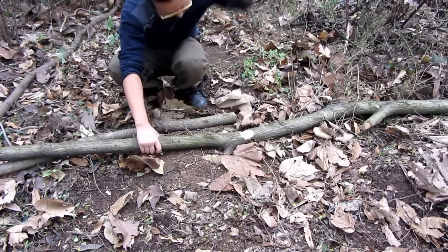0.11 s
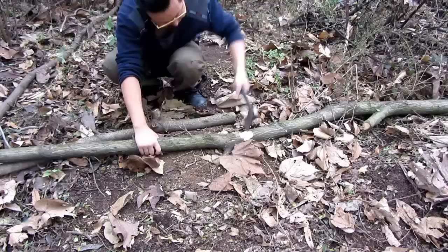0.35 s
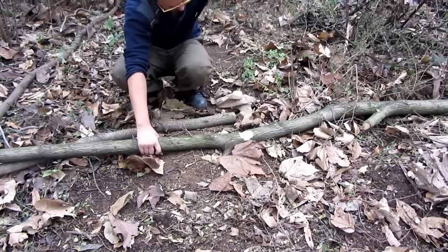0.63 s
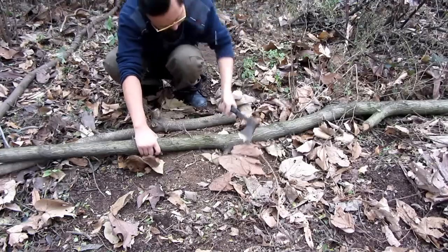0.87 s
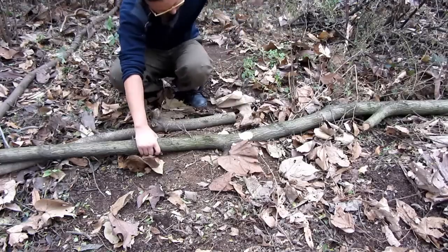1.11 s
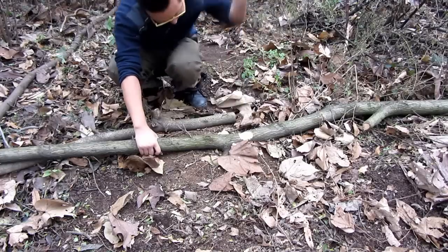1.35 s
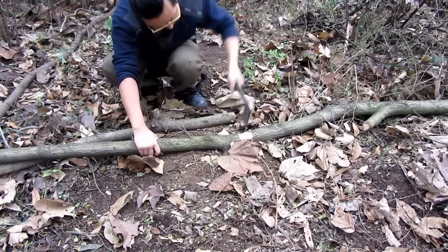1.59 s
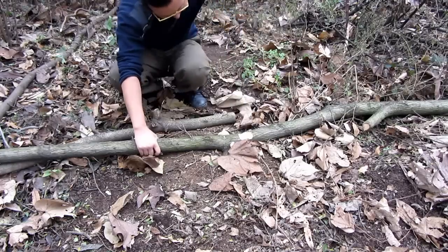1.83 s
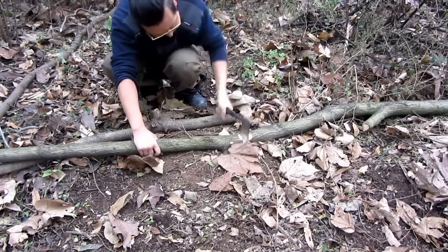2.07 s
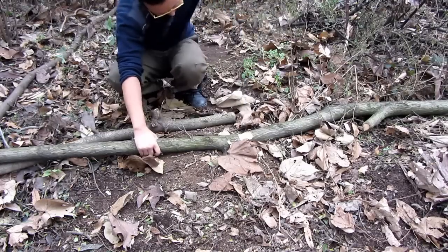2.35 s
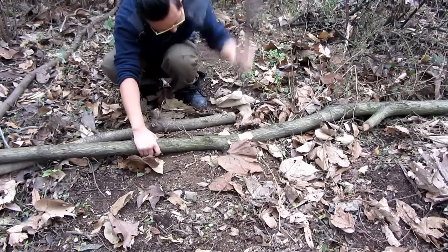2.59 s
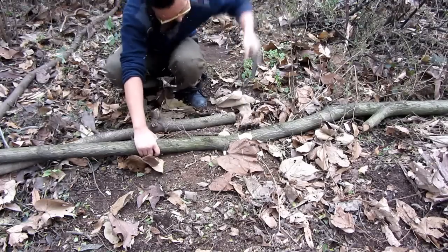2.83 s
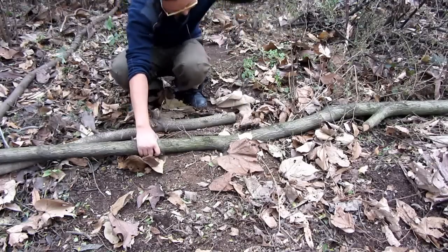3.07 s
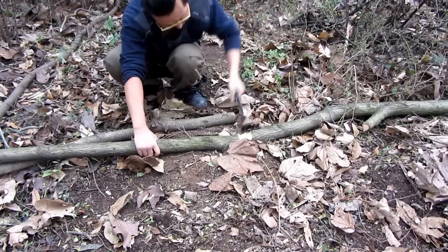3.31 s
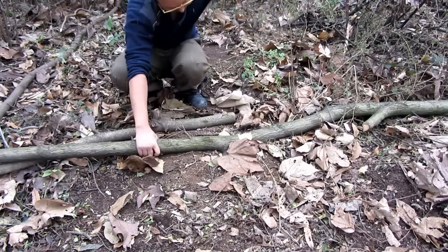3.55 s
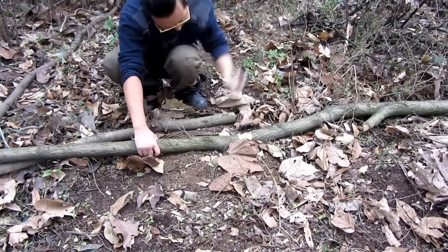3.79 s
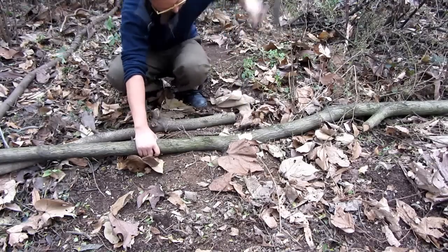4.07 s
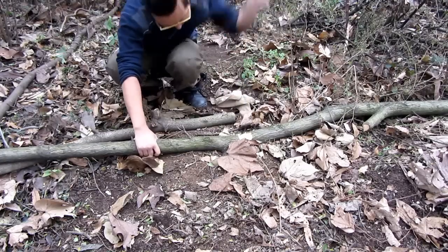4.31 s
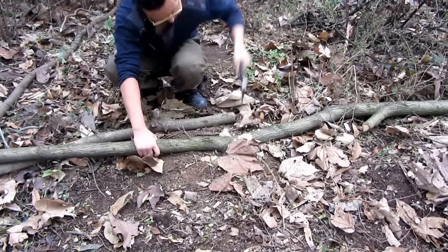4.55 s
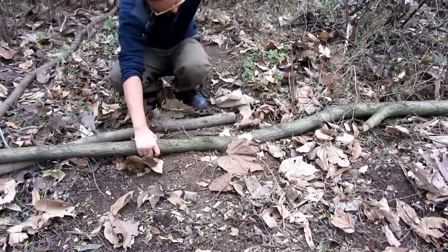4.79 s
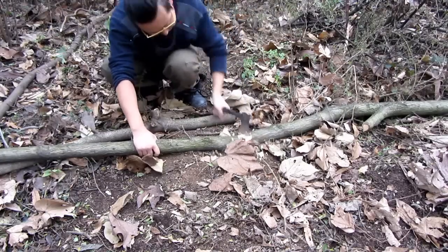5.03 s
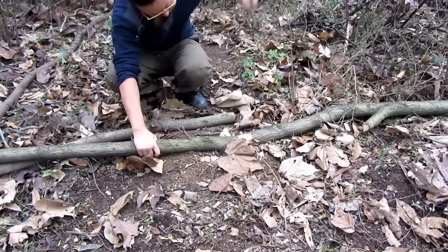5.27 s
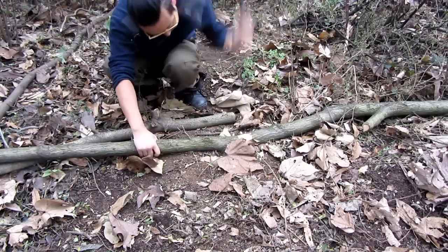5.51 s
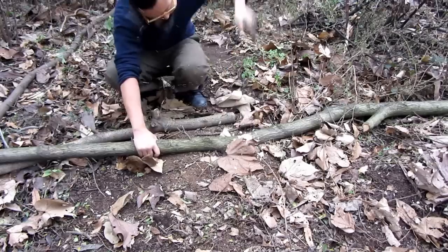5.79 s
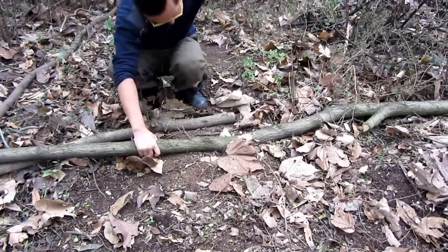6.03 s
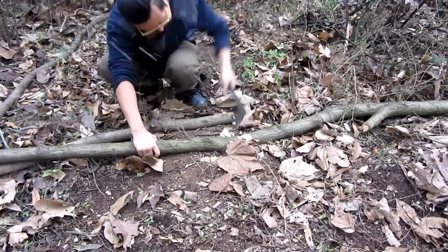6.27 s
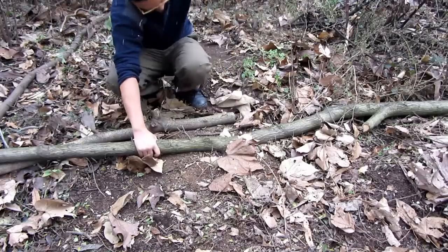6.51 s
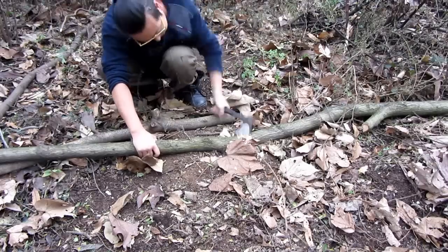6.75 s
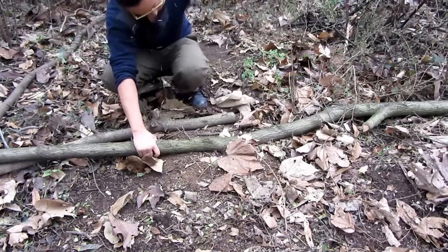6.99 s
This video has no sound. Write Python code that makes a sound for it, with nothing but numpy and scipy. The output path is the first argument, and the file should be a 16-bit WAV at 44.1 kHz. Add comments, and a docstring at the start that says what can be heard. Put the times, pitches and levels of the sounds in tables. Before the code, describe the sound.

Regular dry hacking of a hand blade on a thin branch outdoors, each crisp knock short and bright, with faint leaf ticks between.

```python
"""On a woodland floor, a short blade chops a thin green log, a few steps away.
Each blow is a spiky noise of tearing fibres, a short ping of steel and the fading tones of the log.
Chips tick down in the litter as short clicks; sound processing smears a soft noise around each blow.
Grainy noise makes the rustling leaves; steady noise makes the still air and the hum of far traffic."""
import sys
import numpy as np
from scipy import signal
from scipy.fft import rfft, irfft, next_fast_len
from scipy.io import wavfile
from scipy.ndimage import uniform_filter1d, map_coordinates

SR = 44100
rng = np.random.default_rng(int(sys.argv[2]) if len(sys.argv) > 2 else 0)


def generate_wav(sig):
    """Save sig (samples, or channels by samples) to the path in sys.argv[1] as 16-bit PCM at SR."""
    pcm = np.round(np.clip(np.atleast_2d(sig).T, -1, 1) * 32767).astype(np.int16)
    wavfile.write(sys.argv[1], SR, pcm)


def attenuation_scalar(level_db):
    """Turn a level in dB into a linear amplitude multiplier (20 dB per decade)."""
    decades = np.asarray(level_db, float) / 20
    return 10 ** decades


N = 314433  # length in samples

# blows of the blade: start_s, ring_db, ring_hz (centre of the ring), knock_db, thud_db, edge_db
BLOWS = [(0.32, -15, 1460, -30.5, -22.5, -14), (.921, -15.5, 2000, -25.5, -27, -20.5),
         (1.529, -17, 1300, -22.5, -23, -20), (2.124, -15.5, 1514, -21.5, -27.5, -23),
         (2.7104, -11.5, 977, -23, -30.5, -20.5), (3.3044, -12, 1278, -18.5, -26, -18.5),
         (3.894, -19, 2350, -30, -24, -18), (4.482, -12.5, 1450, -17, -20.5, -16),
         (5.0746, -12, 1429, -23, -22.5, -23), (5.659, -15.5, 1060, -22.5, -22.5, -14),
         (6.2413, -13, 1026, -25, -27, -16), (6.8218, -12, 2700, -22, -20.5, -19.5)]
LIGHT_KNOCK_HZ = 960  # centre of the ring when the log knocks lightly


def unit(x):
    """Scales a sound to an average strength (rms) of 1."""
    return x / np.sqrt(np.mean(x ** 2) + 1e-20)


def along(points, hz):
    """Reads a curve of (pitch_hz, value) points on a logarithmic pitch axis."""
    point_hz, value = np.transpose(points)
    return np.interp(np.log(hz + 1), np.log(point_hz + 1), value)


def curve(rows):
    """Joins (start_s, value) rows into one value per sample."""
    return np.interp(np.arange(N) / SR, *np.transpose(rows))


def filtered(x, response):
    """Shapes a sound by a complex response that depends on frequency."""
    n = x.shape[-1]
    padded = next_fast_len(n + 8192)
    spectrum = rfft(x, padded) * response(np.fft.rfftfreq(padded, 1 / SR))
    return irfft(spectrum, padded)[..., :n]


def add(track, start_s, sound):
    """Mixes a sound into a track, cutting off what runs past the end."""
    part = track[..., round(start_s * SR):][..., :sound.shape[-1]]
    part += sound[..., :part.shape[-1]]


def chops():
    """The edge tears fibres and sets log and blade ringing; the log also knocks lightly."""
    # light knocks of the log, mostly just after a blow: start_s, knock_db, ring_db
    light_knocks = [(0.341, -37.5, -46), (0.373, -44.5, -49), (0.954, -36, -34), (1.558, -34, -31.5),
                    (2.157, -38, -32), (2.193, -54.5, -40.5), (3.393, -52.5, -35.5), (3.907, -36, -26.5),
                    (4.507, -39, -33), (4.562, -51.5, -42.5), (5.066, -41.5, -32.5), (5.116, -44, -57),
                    (5.688, -35.5, -27.5), (5.743, -60, -41), (6.266, -38, -31.5)]
    out = np.zeros((2, N))
    for start_s, ring_db, ring_hz, knock_db, thud_db, edge_db in BLOWS:
        # a brighter edge than usual (-19.5 dB) bites for less time
        bite_ms = 4.17 - 0.19 * (edge_db + 19.5)
        low_crunch = tear((ring_db + edge_db) / 2 + 2, bite_ms, 0, 4425)
        high_crunch = tear(edge_db, 1.13 * bite_ms, 4130, 20000)
        blow = low_crunch + high_crunch + blade(edge_db)
        # the blade sinks in before the log takes the blow; sharper blows sink for less time
        sink_s = 0.002485 * (LIGHT_KNOCK_HZ / ring_hz) ** 2
        add(blow, sink_s, log(thud_db, knock_db, ring_db, ring_hz))
        add(out, start_s, ports(blow))
        add(out, start_s, attenuation_scalar(-19) * echo(blow))
    for start_s, knock_db, ring_db in light_knocks:
        add(out, start_s, ports(log(knock_db, knock_db, ring_db, LIGHT_KNOCK_HZ)))
    return out


def tear(db, bite_ms, lo_hz, hi_hz):
    """Fibres snap in a spiky burst for as long as the edge bites, then splinters settle."""
    # colour of torn wood: pitch_hz, relative level_db (per Hz)
    fibre_colour = [(880, -0.5), (1500, 5), (3690, -2.5), (4730, -12.5), (6240, -4.5), (6760, -11.5),
                    (7840, -8), (9010, -13), (14500, -29), (16000, -77.5)]
    t = np.arange(SR // 4) / SR
    bite = (1 - np.exp(-t / 0.0011)) * np.exp(-(t * 1000 / max(bite_ms, .5)) ** 3)
    settling = (1 - np.exp(-t / 0.0041)) * attenuation_scalar(-13.0 - 60 * t / 0.026)
    # random gains on the noise make it spiky
    spikes = rng.standard_normal(len(t)) * attenuation_scalar(3.2 * rng.standard_normal(len(t)))
    snaps = filtered(spikes, lambda f: attenuation_scalar(along(fibre_colour, f)) * (f >= lo_hz) * (f < hi_hz))
    snaps *= np.linalg.norm(bite) / np.linalg.norm(bite * snaps)  # same strength for every bite
    return attenuation_scalar(db) * snaps * (bite + settling)


def blade(db):
    """The steel gives a brief damped ping: a few tones that die within milliseconds."""
    # tones of the gripped blade: pitch_hz, level_db (relative to the edge), t60_s (time to fall 60 dB)
    blade_modes = [(5500, -3, 0.0086), (5886, -4, 0.016), (7980, -17.5, 0.013)]
    t = np.arange(SR // 4) / SR
    rise = 1 - np.exp(-t / 0.00026)
    ping = np.zeros(len(t))
    for hz, level_db, t60_s in blade_modes:
        fade = attenuation_scalar(db + level_db + rng.normal(0, 3.0) - 60 * t / t60_s)
        ping += fade * rise * np.sin(2 * np.pi * hz * t)
    return ping


def log(thud_db, knock_db, ring_db, ring_hz):
    """The log rings in bending modes; its slow low bending waves arrive last."""
    # bending modes: pitch_hz, level_db (relative to the drive), t60_s (time to fall 60 dB)
    log_modes = [(71.7, 7, 0.087), (134.2, 14, 0.06), (221.7, 3.5, 0.1), (346.8, 7.5, 0.079),
                 (482.6, 6, 0.067), (605.6, 4.5, 0.062), (736, -3.5, 0.086), (818, -1, 0.084),
                 (977, 3, 0.052), (1064.5, -4, 0.047), (1225, 2.5, 0.023), (1450, 3, 0.026),
                 (1669, -2, 0.033), (1881, -4, 0.042), (2180, 6.5, 0.025), (2226, -8.5, 0.024),
                 (2584, -1, 0.038), (2991, 3, 0.018), (3324, 2.5, 0.017)]
    t = np.arange(SR // 4) / SR
    hz, mode_db, t60_s = np.array(log_modes).T[:, :, None]
    # the contact favours modes near its own pitch
    upper_db = ring_db - 9 * np.minimum(np.abs(np.log2(hz / ring_hz)), 1.3)
    # thud drives the lowest modes, knock the middle ones, ring the rest
    drive_db = np.where(hz < 280, thud_db, np.where(hz < 900, knock_db, upper_db))
    rise = 1 - np.exp(-t * hz / 2.02)
    # the held log never rings purely, so each phase wanders
    wander = np.cumsum(rng.standard_normal((len(hz), len(t))), axis=1)
    drift = wander * 0.055 * (hz / 1000) ** 0.27
    phase = 2 * np.pi * (hz * t + rng.random(hz.shape)) + drift
    fade = attenuation_scalar(drive_db + mode_db + rng.normal(0, 0.34, hz.shape) - 60 * t / t60_s)
    return np.sum(fade * rise * np.sin(phase), axis=0)


def ports(x):
    """The log as the two microphone ports hear it; the deep bass falls away."""
    # left over right: pitch_hz, level_db
    lean = [(60, -4), (130, -2.5), (290, 0), (640, -4), (1410, -3), (3100, -2.5), (6820, -0.5),
            (15000, -1.5)]
    # how far the left leads: pitch_hz, phase_radians
    lead = [(60, .2), (200, 0.21), (500, 0.53), (1500, 0.66), (4000, 0.59), (8000, 0.8), (14000, 1.7)]
    halves = [.5, -.5]  # each port takes half of the difference

    def response(f):
        gain = attenuation_scalar(np.outer(halves, along(lean, f)))
        shift = np.exp(1j * np.outer(halves, along(lead, f)))
        return gain * shift * (1j * f / (70 + 1j * f)) ** 3  # bass falls away below 70 Hz

    return filtered(x, response)


def echo(x):
    """A scatter off trunks and litter in the broad colour of x; each frequency dies at its own speed."""
    # echo off trunks: pitch_hz, t60_s (time to fall 60 dB)
    trunk_decay = [(150, 0.09), (600, 0.4), (2000, 0.37), (6000, 0.34), (14000, 0.29)]
    power = np.sum(np.abs(signal.stft(x, nperseg=256)[2]) ** 2, axis=1)
    colour = np.sqrt(uniform_filter1d(power, size=3))
    hz, t, noise = signal.stft(rng.standard_normal((2, SR // 2)), SR, nperseg=256)
    fade = attenuation_scalar(-60 * t / along(trunk_decay, hz)[:, None])
    tail = signal.istft(noise * colour[:, None] * fade, SR, nperseg=256)[1]
    tail *= 1 - np.exp(-np.arange(tail.shape[1]) / SR / 0.0021)  # soft start
    return tail * np.linalg.norm(x) / np.linalg.norm(tail[0])


def chips():
    """Chips land on leaves and the edge grazes bark; many fainter crumbs crackle at random."""
    # chips and twigs landing, bark flakes snapping, the edge grazing bark:
    # start_s, level_db (peak before panning), pitch_hz, t60_s (raised to 0.002 if less), pan_db (left over right)
    ticks = [(0.2529, -46, 6900, 0.0079, -5), (0.5374, -44, 4100, 0.01, -3.5),
             (0.5575, -55, 3460, .006, -5.5), (0.593, -43, 3040, 0.012, -1.5),
             (0.9002, -42.5, 7380, 0.0019, 0.5), (0.949, -34, 6050, 0.015, 3),
             (1.3402, -23.5, 5560, 0.021, -7.5), (1.4847, -38.5, 4640, 0.017, -11),
             (1.661, -43.5, 4700, .012, -12), (2.0357, -38.5, 3430, .01, 0),
             (2.0517, -39.5, 5190, 0.023, -15.5), (2.624, -37.5, 3580, 0.0025, -8),
             (2.8497, -41, 4600, 0.022, -10.5), (2.9379, -23, 5460, 0.025, -10.5),
             (2.945, -25.5, 5320, 0.012, 1), (3.0754, -47, 6150, 0.0091, -5),
             (3.1155, -39, 5850, 0.028, -6), (3.2142, -33.5, 3350, 0.02, 6),
             (3.3892, -36.5, 3660, 0.0076, 9), (3.6325, -44, 5000, 0.01, 0),
             (3.6808, -39, 5500, 0.006, 10.5), (3.879, -42, 5000, .005, -2),
             (4.0404, -45, 4600, 0.0065, -10), (4.2283, -38, 4700, 0.016, -5.5),
             (4.2822, -47, 5180, 0.0069, -14), (4.561, -41, 1970, 0.014, -3),
             (4.8591, -45, 2400, 0.018, -5.5), (4.8888, -49, 6030, .004, -2),
             (4.9487, -53, 5500, .0055, -6), (5.0713, -24.5, 4500, 0.0046, -7),
             (5.3672, -44, 3880, 0.0035, -2), (5.6582, -22, 4500, 0.0065, -8),
             (5.74, -32, 2200, 0.0061, 1.5), (6.03, -47, 2900, .012, -2), (6.055, -39, 3260, 0.012, -1.5),
             (6.086, -44.5, 5630, 0.0077, 0), (6.449, -45, 3240, 0.015, 1), (6.4802, -49, 4090, .011, 3),
             (6.5719, -46, 5600, 0.011, 5.5), (6.6462, -46, 5500, 0.0076, 10),
             (6.7069, -46, 6000, 0.0036, 4), (6.6797, -49, 5400, 0.0066, 8), (6.74, -49, 7400, 0.0042, 10)]
    out = np.zeros((2, N))
    for start_s, db, hz, t60_s, pan_db in ticks:
        click = attenuation_scalar(db) * tick(hz, t60_s, rng.standard_normal(2048))
        add(out, start_s, click * attenuation_scalar([[pan_db / 2], [-pan_db / 2]]))
        add(out, start_s, attenuation_scalar(-3) * echo(click))
    for when, pitch, size, side in rng.random((400, 4)):
        # -62 dB is the least; the log of size is negative, so a few crumbs are louder
        db = -62 - 4.5 * max(np.log(size), -4)
        hz = 5000 * np.exp(1.1 * (pitch - .5))
        click = attenuation_scalar(db) * tick(hz, 0.0033, rng.standard_normal(512))
        add(out, when * N / SR, click * attenuation_scalar([[7 * side - 4], [4 - 7 * side]]))
    return out


def tick(hz, t60_s, noise):
    """A short dry click: a noise burst through one resonance, with a dull body below it."""
    burst = noise * attenuation_scalar(-60 * np.arange(len(noise)) / SR / max(t60_s, .002))

    def peak(f, centre, width):
        pull = 1j * f * centre * width
        return pull / (centre * centre - f * f + pull)

    click = filtered(burst, lambda f: peak(f, hz, .85) ** 2 - attenuation_scalar(-8) * peak(f, 1300, 0.44))
    return click / np.abs(click).max()


def processing_noise():
    """Noise of the sound processing, not of the woods, spreads just ahead of each blow and fades after."""
    # colour of the processing noise: pitch_hz, relative level_db (per Hz)
    smear_colour = [(100, -5), (500, 3), (2500, -6.5), (5000, -3), (10000, -6), (14000, -13.5),
                    (16000, -41.5)]
    t = np.arange(N) / SR
    # seconds from the blow: a first rise, a level stretch, a last rise to the peak, a fade
    steps_s = [-0.032, -0.023, -0.014, 0, 0.035]
    heights = [0, 0.26, 0.26, 1, 0]
    swell = sum(np.interp(t - start_s, steps_s, heights) for start_s, *_ in BLOWS)
    return attenuation_scalar(-38) * swell * rush(smear_colour, patchy_db=3.5)


def woods():
    """Leaves rustle in grainy flickers over the still air and the far hum, all made of coloured noise."""
    # dry leaves stirring: start_s, level_db
    rustle = [(0.0, -66), (0.4, -64.5), (0.77, -67), (1.31, -60.5), (1.53, -51.5), (2.3, -72.5),
              (2.56, -69), (2.86, -63.5), (3.69, -67), (4.39, -66), (4.69, -71), (6.03, -70.5),
              (6.19, -63.5), (6.53, -74), (6.79, -65.5), (7.13, -66.5)]
    # colour of the leaves: pitch_hz, relative level_db (per Hz)
    leaf_colour = [(1060, -54), (1800, -1), (2460, -6), (3510, -0.5), (3910, -5.5), (5340, 0.5),
                   (13400, -20), (14700, -28), (16000, -33.5)]
    # colour of far traffic: pitch_hz, relative level_db (per Hz)
    road_colour = [(15, -62.5), (25, -44.5), (35, -31), (55, 1), (173, -2), (205, -4.5), (371, -6),
                   (617, -7.5), (905, -7.5), (1070, -12.5), (1510, -14), (4000, -31.5), (5200, -79),
                   (8800, -120)]
    # colour of the still woodland hiss: pitch_hz, relative level_db (per Hz)
    air_colour = [(1470, -26.5), (2500, 2), (4140, -14), (5690, -9.5), (7190, -6.5), (14000, -25),
                  (16000, -48)]
    # smooth random curves: a fresh value every 150 or 1500 samples
    flicker = map_coordinates(rng.standard_normal(N // 150 + 4), [np.arange(N) / 150])
    swells = map_coordinates(rng.standard_normal(N // 1500 + 4), [np.arange(N) / 1500])
    grains = unit(attenuation_scalar(2.7 * flicker + 1.1 * swells) * rush(leaf_colour, patchy_db=2.5))
    leaves = attenuation_scalar(curve(rustle)) * grains
    hum = attenuation_scalar(-55) * rush(road_colour, patchy_db=0.83) * attenuation_scalar([[-.7], [.7]])  # a little to the right
    air = attenuation_scalar(-72.0) * rush(air_colour, patchy_db=1.5)
    return leaves + hum + air


def rush(colour, patchy_db):
    """Stereo noise of rms 1 with patches of random gain in time and pitch."""
    # how alike left and right are: pitch_hz, likeness (1 = the same)
    alike = [(60, 0.61), (240, 0.79), (950, 0.12), (3770, 0.16), (15000, 0.069)]
    noise = signal.stft(rng.standard_normal((2, N)), nperseg=512)[2]
    field = uniform_filter1d(rng.standard_normal(noise.shape[1:]), size=6, axis=0)
    field = uniform_filter1d(field, size=10, axis=1)
    pair = signal.istft(noise * attenuation_scalar(patchy_db * unit(field)), nperseg=512)[1][:, :N]

    def response(hz):
        turn = np.arccos(np.clip(along(alike, hz), -1, 1)) / 2  # less alike: more side, less middle
        return attenuation_scalar(along(colour, hz)) * [np.cos(turn), np.sin(turn)]

    mid, side = filtered(pair, response)
    return unit(np.array([mid + side, mid - side]))


def scene():
    """All the layers, mixed in stereo."""
    return chops() + processing_noise() + chips() + woods()


def band_limit(x):
    """A steep low-pass at the top of the band."""
    return signal.sosfilt(signal.butter(12, 16440, fs=SR, output="sos"), x)


def record(dry):
    """The input stage rounds off the hardest peaks."""
    rounded = dry / (1 + np.abs(dry / .72) ** 4) ** (1 / 4)  # never passes 0.72
    return band_limit(rounded)


dry = scene()
out = record(dry)
generate_wav(out)
```